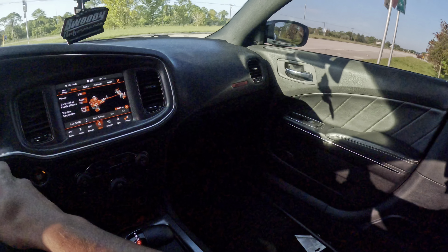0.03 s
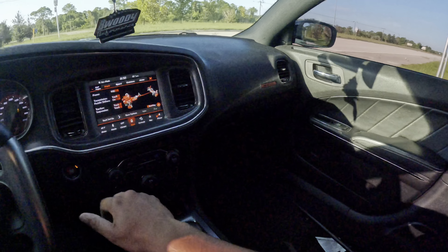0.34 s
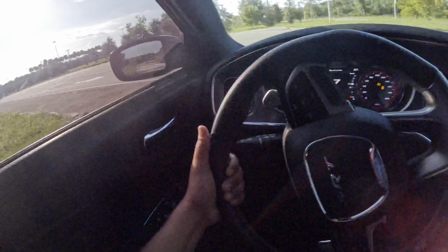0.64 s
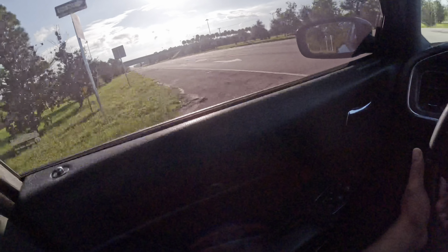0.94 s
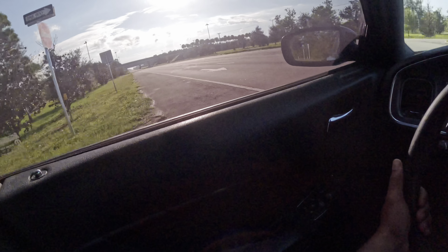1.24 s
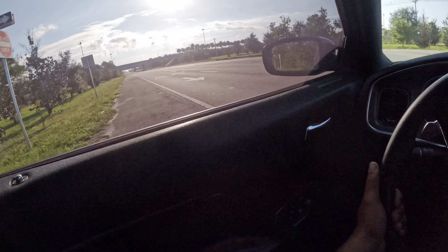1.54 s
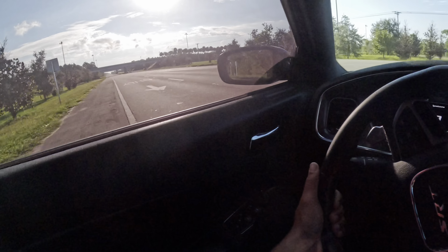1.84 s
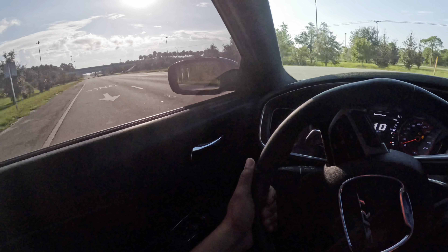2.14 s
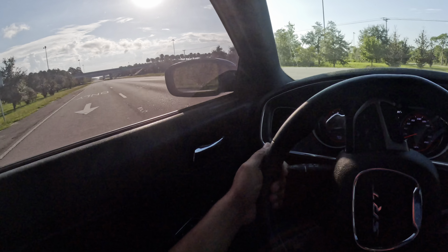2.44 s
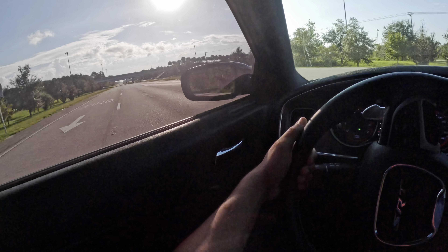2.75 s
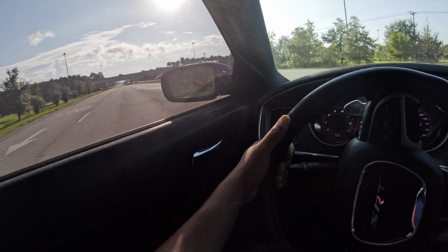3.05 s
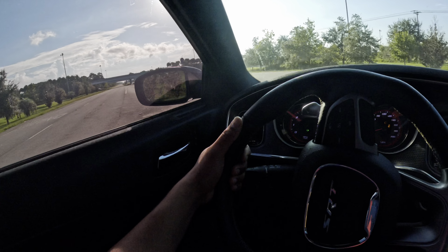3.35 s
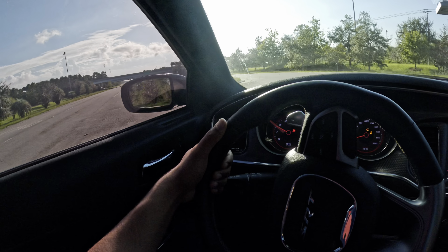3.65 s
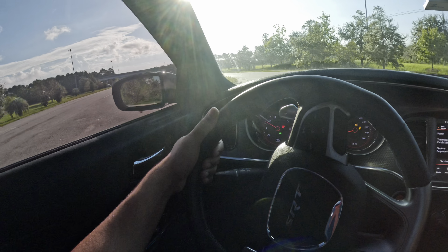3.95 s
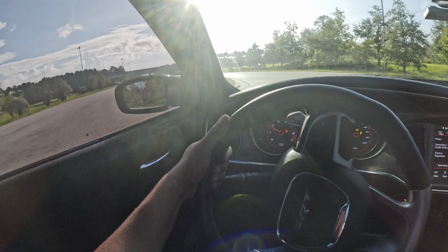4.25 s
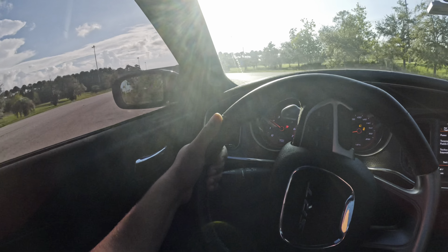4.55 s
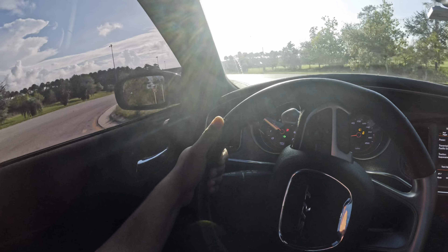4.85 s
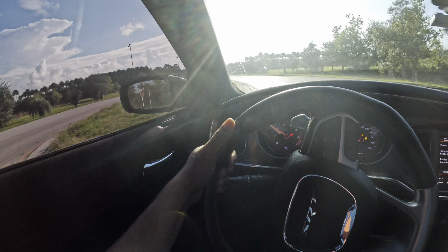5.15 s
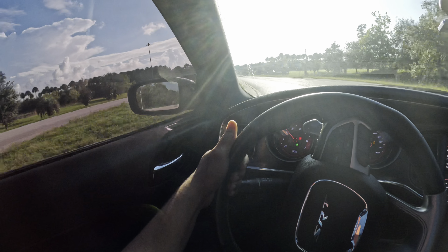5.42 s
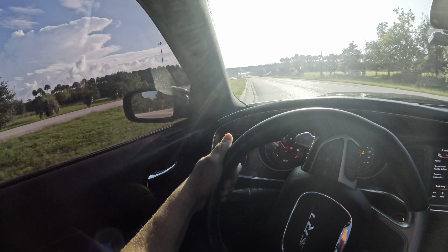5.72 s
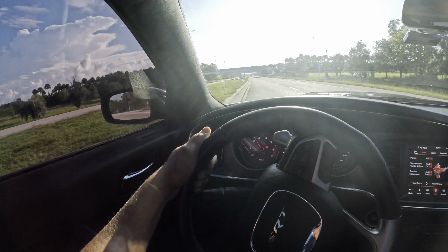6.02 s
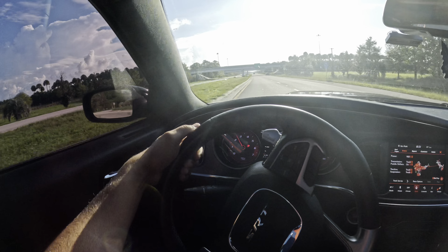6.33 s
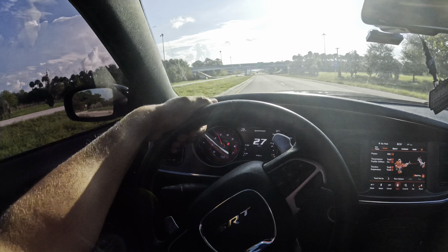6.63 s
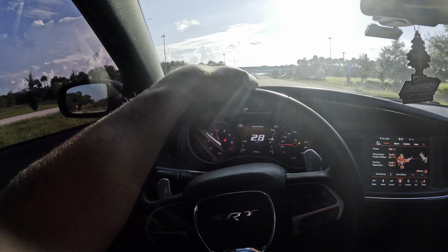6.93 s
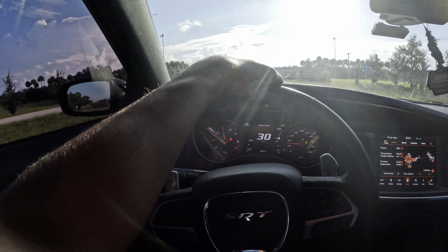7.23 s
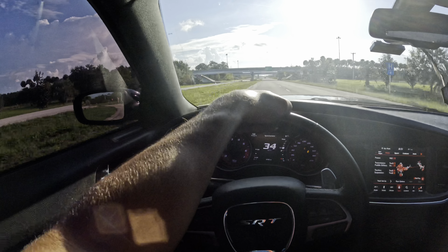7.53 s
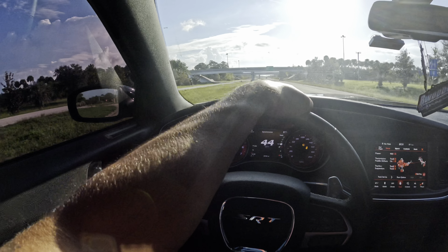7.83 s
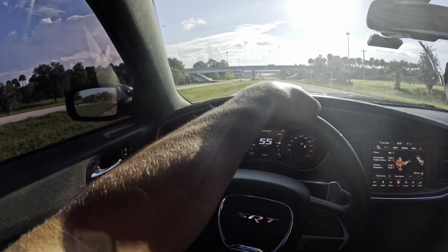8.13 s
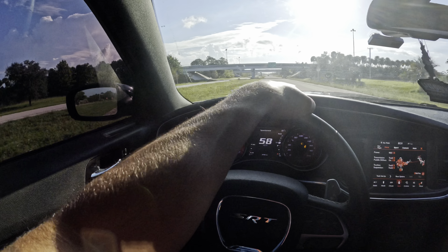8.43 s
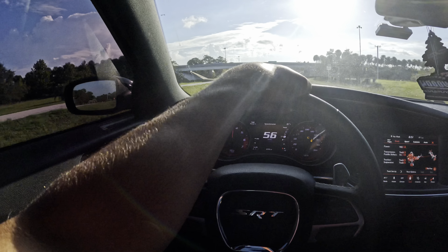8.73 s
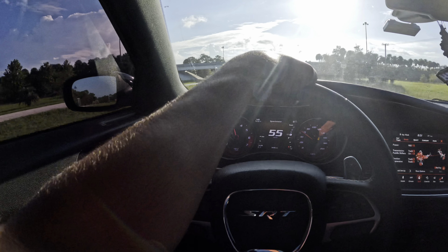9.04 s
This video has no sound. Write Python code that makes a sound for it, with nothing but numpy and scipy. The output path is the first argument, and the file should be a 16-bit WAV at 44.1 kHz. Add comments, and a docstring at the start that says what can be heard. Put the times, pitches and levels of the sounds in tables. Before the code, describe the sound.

Inside a car, a supercharged V8 rises gently from idle while the turn signal ticks, then roars under full throttle.

```python
"""Inside a car, at the driver's seat: a supercharged V8 pulls away from idle and climbs gently while the
indicator ticks, then is floored, flares to the top of its range, drops back and pulls again.
Exhaust pulses form a harmonic series that booms through the cabin's standing waves. Above it lie intake
growl, valve clatter, supercharger hiss and buzzing panels; the cabin rumbles low from engine and road,
plastic trim clicks, a few dull knocks sound and a palm slides once on the steering wheel."""
import sys
import numpy as np
from scipy import signal
from scipy.fft import rfft, irfft, next_fast_len
from scipy.io import wavfile
from scipy.ndimage import uniform_filter1d, map_coordinates

SR = 44100
rng = np.random.default_rng(int(sys.argv[2]) if len(sys.argv) > 2 else 0)


def generate_wav(sig):
    """Save sig (samples, or channels by samples) to the path in sys.argv[1] as 16-bit PCM at SR."""
    pcm = np.round(np.clip(np.atleast_2d(sig).T, -1, 1) * 32767).astype(np.int16)
    wavfile.write(sys.argv[1], SR, pcm)


N = 409248
T = np.arange(N) / SR

# crank speed: time_s, speed_rpm
CRANK_SPEED = [(0.0, 715.0), (0.5, 735.0), (0.85, 919.0), (1.05, 994.0), (1.22, 1115.0), (1.43, 1284.0),
               (1.7, 1396.0), (2.0, 1513.0), (2.45, 1596.0), (2.85, 1672.0), (3.25, 1722.0), (3.54, 1700.0),
               (3.95, 1836.0), (4.3, 1944.0), (4.64, 2075.0), (5.1, 2220.0), (5.66, 2400.0), (6.3, 2638.0),
               (6.96, 2920.0), (7.2, 3198.0), (7.38, 3689.0), (7.54, 4067.0), (7.68, 4627.0), (7.8, 5148.0),
               (7.93, 5615.0), (8.05, 5784.0), (8.22, 5724.0), (8.29, 5034.0), (8.37, 4311.0),
               (8.46, 4162.0), (8.53, 3890.0), (8.61, 3425.0), (8.74, 3385.0), (8.83, 2860.0),
               (8.97, 2868.0), (9.08, 3446.0), (9.19, 4040.0), (9.28, 4123.0)]
# the driver's foot: time_s, throttle_fraction
PEDAL = [(0, 0.07), (.55, 0.15), (1.3, 0.05), (2.1, 0.18), (3.9, 0.24), (5.3, 0.18), (6.05, 0.31),
         (6.48, 0.52), (6.98, 0.62), (7.09, 0.91), (7.19, .76), (7.26, 1), (7.65, 1), (7.92, 0.92),
         (8.1, 1), (8.6, 0.93), (9.28, 1)]
# low cabin rumble from engine and road: frequency_hz, gain_db
RUMBLE_SPECTRUM = [(20, -18), (45, -2.5), (75, 4.5), (130, -0.5), (240, 7.5), (400, -13.5), (560, -4),
                   (750, -56.5)]
# its strength, greatest at idle and peak revs: time_s, level_db
RUMBLE_LEVELS = [(0, -30), (.6, -32), (1.4, -38), (3, -33.5), (5, -42), (6, -33.5), (7.7, -47),
                 (8.2, -26.5), (8.9, -40)]
# a palm sliding on the wheel: start_s, length_s, level_db
PALM_SLIDES = [(1.103, 0.25, -56.5)]
# its friction noise: frequency_hz, gain_db
PALM_SPECTRUM = [(900, -18), (2600, 3), (4500, -3), (7000, -16), (10000, -25)]
# plastic clicks: start_s, level_db, knock_re_snap_db
TRIM_CLICKS = [(0.378, -48, -7), (0.39, -43.5, -8), (0.5931, -37.5, -5.5), (.632, -62, 11),
               (0.771, -65, 13), (1.158, -59.5, 9), (1.187, -60, 6), (1.275, -60, 6), (2.552, -59, 10),
               (6.809, -44.5, 6), (6.8433, -53.5, 12.5)]
# dull knocks, two at idle, then the low body of a click and of a tick: start_s, level_db
DULL_KNOCKS = [(.019, -46), (0.126, -43.5), (.594, -42), (.908, -50)]
# ringing bands of the indicator's clicks: pitch_hz, width_hz, t60_s, tick_db, tock_db
INDICATOR_BANDS = [(1060, 440, 0.17, -3, -9.5), (1880, 400, 0.077, -6, -2), (2643, 110, 0.073, -16.5, 6),
                   (3100, 400, 0.037, -4.5, -22), (3700, 550, 0.14, -6.5, -9.5),
                   (5080, 250, .065, -9, -6.5), (5350, 300, 0.072, -1, -14.5),
                   (6600, 400, 0.051, -19.5, -12)]
# two buzzing panels: pitch_hz, width_hz
PANEL_MODES = [(1040, 100), (1960, 310)]
# their strength: time_s, lower_panel_db, upper_panel_db
BUZZ_LEVELS = [(0, -72, -80), (.6, -63, -74), (.9, -62.5, -65.5), (1.6, -58, -64.5), (2.0, -61, -58),
               (2.9, -70, -59), (3.25, -63, -69.5), (3.9, -49.5, -57), (4.4, -66.5, -72.5),
               (5.3, -64.5, -68.5), (6.0, -58, -61), (6.5, -59, -55), (7.0, -63, -58), (9.28, -58.5, -51.5)]
# supercharger hiss: frequency_hz, gain_db
HISS_SPECTRUM = [(2000, -25), (4500, -0.5), (6400, -3), (8400, -12), (9200, -30), (10000, -21.5),
                 (12000, -21.5), (14000, -39)]
# intake growl: frequency_hz, gain_db
INTAKE_SPECTRUM = [(450, -36.5), (620, 4.5), (780, -1), (920, -2), (1100, -4.5), (1300, -11), (1500, -16.5),
                   (2200, -45)]
# narrow intake resonances: pitch_hz, half_width_hz, gain_db
INTAKE_MODES = [(783, 30, 7), (867, 6.9, 3.5), (1150, 6, 2.5), (1319, 12, 7.5)]
# mechanical rush at light and at heavy throttle: frequency_hz, gain_db
LIGHT_RUSH_SPECTRUM = [(900, -32), (1300, -10), (1550, -7), (1800, -5.5), (2100, -12.5), (2400, -12.5),
                       (3300, -14), (4000, -15.5), (5150, -18), (6600, -28), (8400, -31), (9500, -56),
                       (14000, -57)]
HEAVY_RUSH_SPECTRUM = [(760, -20), (1300, -7.5), (1430, -4), (1700, 1.5), (2190, 0), (2260, -3.5),
                       (3050, -11), (3400, -8), (5300, -22.5), (6400, -26), (8400, -41.5), (9300, -65),
                       (14000, -88.5)]
# exhaust drive of orders 8, 16, 24 and the rest: time_s, firing_db, octave_db, third_harmonic_db, lope_db
EXHAUST_DRIVE = [(0, -21.5, -27.5, -43, -42.5), (.5, -20, -28, -41, -43), (.75, -13, -17.5, -32, -37),
                 (.97, -14.5, -14, -35, -38.5), (1.2, -7, -24, -28, -36.5), (1.35, -13, -35, -43, -36.5),
                 (1.7, -13.5, -36.5, -20.5, -32), (2.2, -14, -41.5, -24.5, -31.5),
                 (2.8, -16, -45.5, -36.5, -29.5), (3.3, -15, -33.5, -31, -30.5),
                 (3.7, -13, -25.5, -31, -29.5), (4.1, -10, -29, -25.5, -32), (4.45, -11.5, -22.5, -24, -35),
                 (4.75, -11.5, -12, -22.5, -37.5), (5.25, -9.5, -11, -24, -34),
                 (5.65, -18.5, -21, -23.5, -34.5), (5.9, -23, -25, -36, -30), (6.3, -12, -27, -37, -29.5),
                 (6.75, -13.5, -22, -34, -30.5), (7.15, -13.5, -24, -20.5, -30),
                 (7.3, -11, -24.5, -36.5, -29), (7.46, -16.5, -30, -28.5, -26.5),
                 (7.62, -9, -26.5, -24.5, -24.5), (7.9, -16, -31, -20, -23.5),
                 (8.12, -19, -28.5, -25, -23.5), (8.28, -15, -38, -34, -25), (8.41, -10.5, -28, -31, -25.5),
                 (8.52, -13.5, -30, -32.5, -29), (8.8, -16, -24, -26, -29.5),
                 (9.1, -13.5, -25, -27.5, -28.5), (9.28, -14.5, -36, -32, -25)]
# pulse train harmonics: multiple_of_cycle, flap_shut_db, flap_open_db, high_revs_db
EXHAUST_ORDERS = [(1, -14, -7, 0), (2, -5.5, 0.5, 0.5), (3, -2.5, -7.5, -7.5), (4, -8.5, -8.5, -0.5),
                  (5, -5, -2, -2), (6, -2.5, 3.5, 3), (7, -6, 0, -6), (8, -2.5, 3.5, 2.5), (9, -10, 5, 1),
                  (10, 7.5, 3.5, 2.5), (11, -0.5, 2, 6.5), (12, -9.5, 6, -4), (13, -2.5, -5.5, -2.5),
                  (14, 4.5, 5.5, -3.5), (15, -10.5, -2, -7.5), (16, -4.5, 4.5, 5.5), (17, -2.5, 0, -3.5),
                  (18, 0, 2, 2.5), (19, -5.5, -4.5, -6.5), (20, -6.5, 0.5, -6), (21, -1, -5, 3),
                  (22, 1, -3, -4.5), (23, -6, -6.5, -8.5), (24, -4.5, -2, 2), (25, -8.5, -9.5, -2.5),
                  (26, -3, -15, -2), (27, -12, -15, -2), (28, -8.5, -17.5, 2), (29, -11, -20, -0.5),
                  (30, -7.5, -4.5, -3), (31, -18, -2.5, -6), (32, -3.5, -12.5, -1.5), (33, -8, -10.5, -2),
                  (34, -15.5, -11.5, -0.5), (40, -15.5, -8, -6.5)]
# which of a cycle's eight firings leave through the nearer pipe: slot_index
NEAR_BANK_FIRINGS = np.array([0, 3, 5, 6])
# turbulent exhaust puffs: frequency_hz, gain_db
PUFF_SPECTRUM = [(30, -10), (75, -3.5), (130, -13), (240, -7), (340, 8), (550, -3), (800, -14.5),
                 (2000, -51)]
# their strength, raised when lugging and flat out: speed_rpm, level_db
PUFF_LEVELS = [(705, -37), (950, -34), (1250, -28.5), (1550, -32.5), (2300, -31.5), (2900, -36.5),
               (4000, -19.5), (5800, -25)]
# transmission through the body shell: frequency_hz, gain_db
SHELL_TRANSMISSION = [(30, -26), (60, -19.5), (110, -8), (200, -3), (350, -11), (500, -12.5), (700, -14.5),
                      (1000, -24.5), (1500, -43.5)]
# standing-wave peaks and nulls at the driver's head: pitch_hz, half_width_hz, gain_db
CABIN_MODES = [(75, 6.5, 6.5), (143.9, 20.7, 12.5), (166.7, 19.1, -15.5), (189.6, 3.8, 3.5), (213, 22, 0),
               (252.5, 17.6, 10.5), (281.1, 16.4, -8), (339.3, 12.5, 7.5), (372, 14, 9.5), (404.3, 16, 6),
               (455.4, 36.3, 9.0), (514, 42, 4.5), (572.4, 18, 11), (620, 30, 6)]

IDLE_RPM = 705
BLINK_START_S, BLINK_PERIOD_S, TOCK_DELAY_S = .2285, .6795, .3322
TICK_DB, TOCK_DB, TICK_FADE_DB_PER_S = -44.5, -46.5, 0.8
FLAP_OPENS_S, FLAP_TRAVEL_S = 5.68, 0.15  # an exhaust flap opens and the note turns throaty
HIGH_REVS_FROM_RPM, HIGH_REVS_SPAN_RPM = 2950, 600


def undb(db):
    """Decibels to amplitude ratio."""
    return np.exp(np.asarray(db) * (np.log(10) / 20))


def unit(x):
    """Normalisation to rms 1."""
    return x / np.sqrt(np.mean(x ** 2))


def curves(table):
    """Linear interpolation of each column over time."""
    times, *columns = np.transpose(table)
    return [np.interp(T, times, column) for column in columns]


def noise():
    """Gaussian white noise."""
    return rng.standard_normal(N)


def wander(clock):
    """Slow random modulation: a new value at each whole step of the clock, joined by straight lines."""
    values = rng.standard_normal(int(clock[-1]) + 2)
    step = clock.astype(int)
    return values[step] + np.diff(values)[step] * (clock - step)


def add(out, start_s, sound):
    """Superposition of a sound at a given time."""
    start = int(start_s * SR)
    out[start:start + len(sound)] += sound[:N - start]


def colour(x, spectrum, modes=()):
    """Minimum-phase filtering by a broad spectrum plus resonant peaks and nulls."""
    size = next_fast_len(N + SR // 2, True)
    size += size % 2
    hz = np.arange(size // 2 + 1) * SR / size + 1
    points_hz, points_db = np.transpose(spectrum)
    db = np.interp(np.log(hz), np.log(points_hz), points_db)
    for pitch_hz, half_width_hz, gain_db in modes:
        db = db + gain_db / (1 + ((hz - pitch_hz) / half_width_hz) ** 2)
    cepstrum = irfft(np.log(undb(db)))
    cepstrum[1:size // 2] *= 2  # folding the cepstrum makes the filter causal
    cepstrum[size // 2 + 1:] = 0
    return irfft(rfft(x, size) * np.exp(rfft(cepstrum)))[:N]


def resonate(x, pitch_hz, width_hz):
    """Resonance: two passes through one band-pass, scaled to rms 1."""
    b, a = signal.iirpeak(pitch_hz, pitch_hz / width_hz, fs=SR)
    return unit(signal.lfilter(b, a, signal.lfilter(b, a, x)))


def ring(pitch_hz, width_hz, t60_s, size=5000):
    """Damped ringing: a band of noise decays exponentially."""
    band = resonate(rng.standard_normal(size), pitch_hz, width_hz)
    return band * np.exp(-np.log(1000) * T[:size] / t60_s)


def reflections(x, t60_s, wet, head_moves_per_s=.7, size=4000, count=4):
    """Interference: short echoes off glass and panels form a comb that shifts as the head moves."""
    tails = rng.standard_normal((count, size)) * np.exp(-np.log(1000) * T[:size] / t60_s)
    tails /= np.linalg.norm(tails, axis=1, keepdims=True)
    weights = np.array([wander(head_moves_per_s * T + rng.random()) for _ in tails])
    weights /= np.sqrt(np.sum(weights ** 2, axis=0))
    echoes = signal.oaconvolve(x[None], tails, axes=1)[:, :N]
    return x + wet * np.sum(weights * echoes, axis=0)


def strain(throttle):
    """Threshold law: zero at light throttle, then rising as the engine turns hard and ragged."""
    return np.clip((throttle - 0.39) / 0.8, 0, 1)


def pulsation(cycle, depth):
    """Amplitude modulation of the gas flow by eight firings a cycle."""
    return 1 + depth * np.cos(2 * np.pi * 8 * cycle)


def cabin_rumble():
    """Low-frequency noise: engine and road rumble in the cabin, strongest at idle and peak revs."""
    level_db, = curves(RUMBLE_LEVELS)
    return unit(colour(noise(), RUMBLE_SPECTRUM)) * undb(level_db + 2.0 * wander(6 * T))


def palm_on_wheel(slip_db=5, slips_per_s=50):
    """Stick-slip friction: a palm grips and slips on the rim in quick little swishes."""
    swell = sum(undb(level_db) * np.sin(np.pi * np.clip((T - start_s) / length_s, 0, 1))
                for start_s, length_s, level_db in PALM_SLIDES)
    slips = unit(undb(slip_db * wander(slips_per_s * T)))
    return swell * slips * unit(colour(noise(), PALM_SPECTRUM))


def clicks_and_knocks():
    """Damped transients: plastic trim gives a bright snap over a duller knock; four knocks sound lower."""
    out = np.zeros(N)
    for start_s, level_db, knock_db in TRIM_CLICKS:
        knock = ring(2600, 2400, t60_s=.06)
        snap = ring(6000, 2600, t60_s=.015)
        add(out, start_s, undb(level_db) * (snap + undb(knock_db) * knock))
    for start_s, level_db in DULL_KNOCKS:
        add(out, start_s, undb(level_db) * ring(764, 610, t60_s=.12))
    return out


def indicator(clicks=19, snap_db=-11.5):
    """Exponential decay: the indicator alternates tick and tock, each a short ringing click."""
    out = np.zeros(N)
    for click in range(clicks):
        blink, is_tock = divmod(click, 2)
        start_s = BLINK_START_S + blink * BLINK_PERIOD_S + is_tock * TOCK_DELAY_S
        level_db = (TOCK_DB if is_tock else TICK_DB) - TICK_FADE_DB_PER_S * start_s
        ringing = sum(undb(band_db[is_tock]) * ring(pitch_hz, width_hz, t60_s)
                      for pitch_hz, width_hz, t60_s, *band_db in INDICATOR_BANDS)
        snap = ring(3000, 5000, t60_s=.055)
        add(out, start_s, undb(level_db) * (ringing + undb(snap_db) * snap))
    return out


def panels(shake, cycle, burst_db=3.5):
    """Forced vibration: the engine's shaking makes two panels buzz in uneven bursts."""
    out = np.zeros(N)
    for (pitch_hz, width_hz), level_db in zip(PANEL_MODES, curves(BUZZ_LEVELS)):
        out += resonate(shake, pitch_hz, width_hz) * undb(level_db + burst_db * wander(cycle))
    return out


def supercharger(throb, start_s=7.22, attack_s=.03, level_db=-52.5):
    """Flow noise: pumped air hisses, starting as the pedal reaches the floor."""
    flow = np.clip((T - start_s) / attack_s, 0, 1)
    return undb(level_db) * flow * throb * unit(colour(noise(), HISS_SPECTRUM))


def clatter(cycle, periodic_share, changes_per_s=1.5, size=768):
    """Periodicity: valve and rotor noise that recurs each cycle forms gliding lines; the rest is hiss."""
    clock = changes_per_s * T
    orders = rfft(rng.standard_normal((int(clock[-1]) + 2, size)))
    orders[:, ::8] *= np.sqrt(2)  # stronger on the firing harmonics
    patterns = unit(irfft(orders))
    step, position = clock.astype(int), cycle % 1 * size
    old, new = (map_coordinates(patterns, [row, position], order=1, mode="grid-wrap")
                for row in (step, step + 1))
    fade = clock % 1 * np.pi / 2
    periodic = np.cos(fade) * old + np.sin(fade) * new
    periodic *= np.sqrt(np.gradient(cycle) * size)  # offsets the crowding of lines at low speed
    return np.sqrt(periodic_share) * periodic + np.sqrt(1 - periodic_share) * noise()


def engine_bay(cycle, rpm, throttle):
    """Source and filter: clatter becomes intake growl and mechanical rush, joined by buzz and hiss."""
    octaves = np.log2(rpm / IDLE_RPM)
    growl_db = -56.5 + 22.5 * throttle + 3 * octaves
    rush_db = -61 + 23.5 * throttle + 1.58 * octaves
    hard = strain(throttle)
    throb = pulsation(cycle, depth=.13) * undb(wander(3 * cycle) + .28 * np.cos(2 * np.pi * cycle))
    intake = reflections(clatter(cycle, .68 - .38 * hard) * throb, t60_s=.14, wet=.8)
    valves = reflections(clatter(cycle, .55 - .3 * hard) * throb, t60_s=.08, wet=.35)
    singing = np.clip((rpm - 1850) / 400, 0, 1)  # the intake resonates only at higher revs
    plain = unit(colour(intake, INTAKE_SPECTRUM))
    resonant = unit(colour(intake, INTAKE_SPECTRUM, INTAKE_MODES))
    growl = (1 - singing) * plain + singing * resonant
    light = unit(colour(valves, LIGHT_RUSH_SPECTRUM))
    heavy = unit(colour(valves, HEAVY_RUSH_SPECTRUM, [(2197, 15, 1.9)]))
    rush = (1 - hard) * light + hard * heavy
    return undb(growl_db) * growl + undb(rush_db) * rush + panels(valves, cycle) + supercharger(throb)


def exhaust_puffs(cycle, rpm):
    """Turbulence: each firing throws out a puff, and the puffs swell once a cycle."""
    level_db = np.interp(rpm, *np.transpose(PUFF_LEVELS))
    throb = pulsation(cycle, depth=.51) * (1 + .2 * np.cos(2 * np.pi * cycle))
    return undb(level_db) * throb * unit(colour(noise(), PUFF_SPECTRUM))


def exhaust(cycle, rpm, throttle, swell_db=1.8):
    """Fourier series of a pulse train: uneven bank rhythm fills in orders between firing harmonics."""
    *harmonic_db, lope_db = curves(EXHAUST_DRIVE)
    flap = np.clip((T - FLAP_OPENS_S) / FLAP_TRAVEL_S, 0, 1)
    high_revs = np.clip((rpm - HIGH_REVS_FROM_RPM) / HIGH_REVS_SPAN_RPM, 0, 1)
    # combustion is smoothest at a cruise, lumpy at idle and ragged flat out
    scatter = .09 + .17 * (IDLE_RPM / rpm) ** 2 + .3 * strain(throttle)
    uneven_cycle = cycle + .0091 * scatter * wander(4 * cycle)
    pulses = np.zeros(N)
    for order, shut_db, open_db, high_db in EXHAUST_ORDERS:
        drive_db = harmonic_db[order // 8 - 1] if order in (8, 16, 24) else lope_db
        looseness = .3 if order == 8 else np.clip(order / 18, .9, 1.6)  # the firing note is firmest
        flutter = 1 + looseness * scatter * wander(.7 * cycle)
        drift = looseness * wander(2 * T)  # arrival by many paths shifts phase and level
        # the orders line up on the near bank's uneven firings, so the note throbs
        bank_phase = np.angle(np.sum(np.exp(-2j * np.pi * order * NEAR_BANK_FIRINGS / 8)))
        phase = bank_phase + .4 * rng.standard_normal() + .4 * drift
        pattern_db = shut_db + (open_db - shut_db) * flap + (high_db - open_db) * high_revs
        amplitude = np.sqrt(2) * undb(pattern_db + drive_db + swell_db * drift) * flutter
        pulses += amplitude * np.cos(2 * np.pi * order * uneven_cycle + phase)
    return colour(pulses + exhaust_puffs(cycle, rpm), SHELL_TRANSMISSION, CABIN_MODES)


def scene():
    """Superposition at the driver's head; the engine's four-stroke cycle spans two crank turns."""
    rpm, = curves(CRANK_SPEED)
    throttle, = curves(PEDAL)
    cycle_hz = uniform_filter1d(rpm, size=1500, mode="nearest") / 120
    cycle = np.cumsum(cycle_hz) / SR
    engine = exhaust(cycle, rpm, throttle) + engine_bay(cycle, rpm, throttle)
    return (engine + cabin_rumble() + indicator() + clicks_and_knocks() + palm_on_wheel())[None]


def record(dry, ceiling=.9, dull_hz=8200, top_hz=13500):
    """Soft saturation rounds the highest peaks; low-pass filters dull the treble and cut the top."""
    rounded = dry / (1 + (np.abs(dry) / ceiling) ** 6) ** (1 / 6)
    muffled = signal.sosfilt(signal.butter(3, dull_hz, fs=SR, output="sos"), rounded)
    return signal.sosfilt(signal.ellip(8, .2, 60, top_hz, fs=SR, output="sos"), muffled)


dry = scene()
out = record(dry)
generate_wav(out)
```